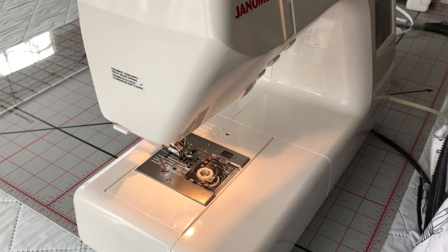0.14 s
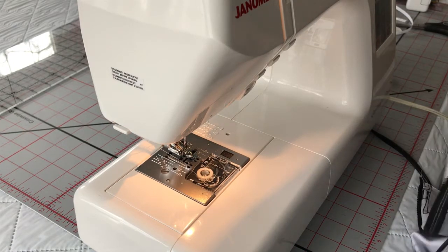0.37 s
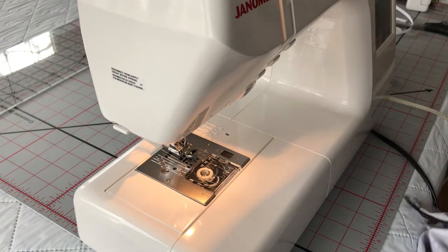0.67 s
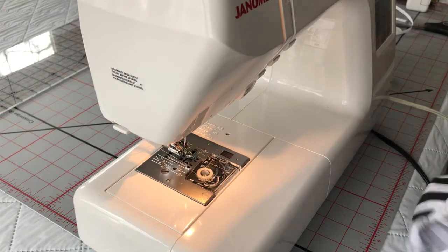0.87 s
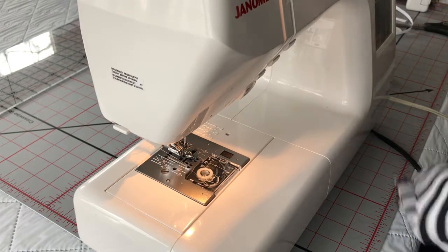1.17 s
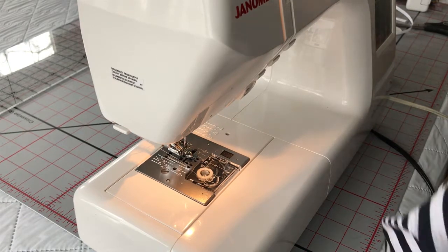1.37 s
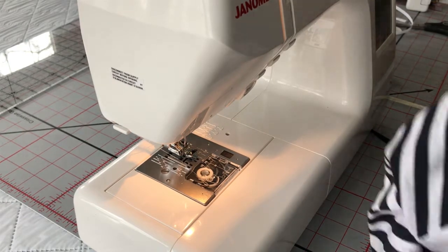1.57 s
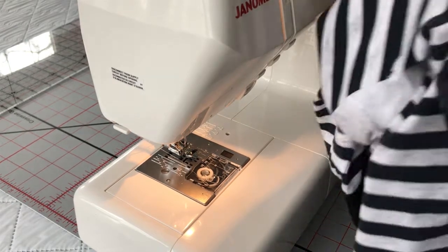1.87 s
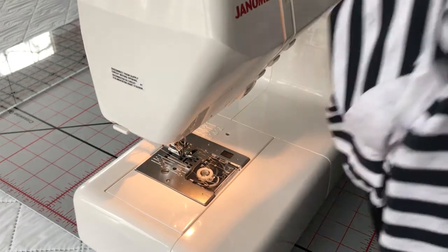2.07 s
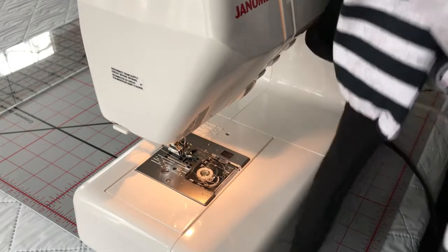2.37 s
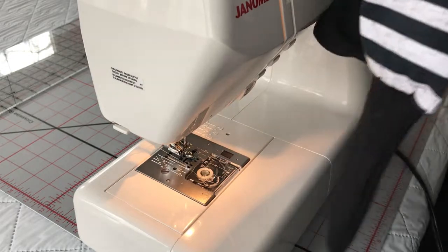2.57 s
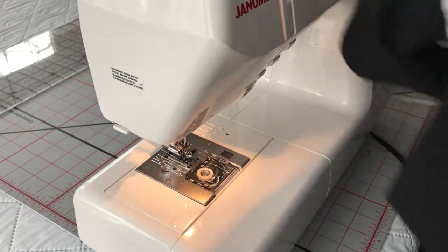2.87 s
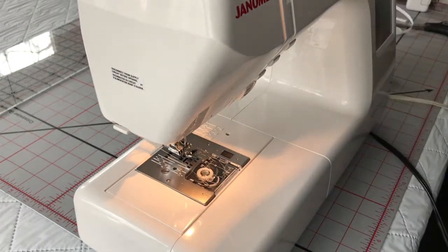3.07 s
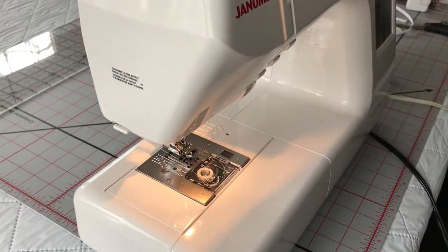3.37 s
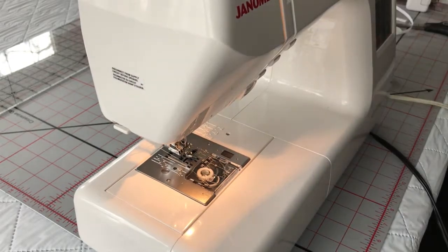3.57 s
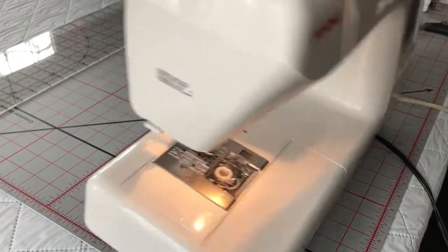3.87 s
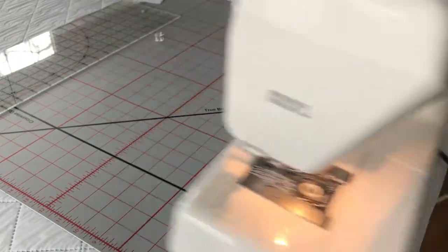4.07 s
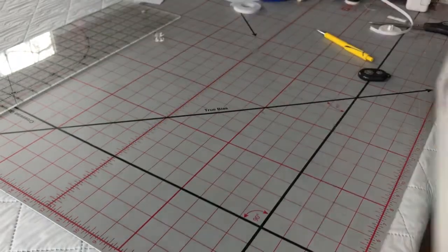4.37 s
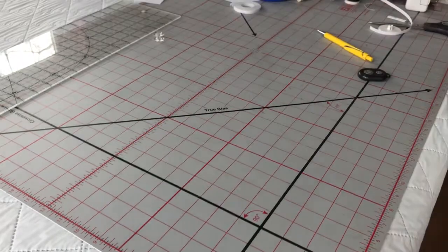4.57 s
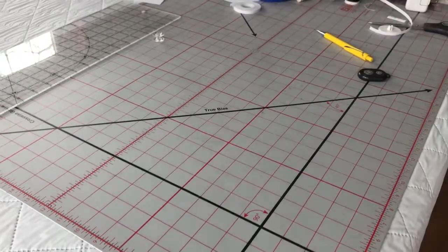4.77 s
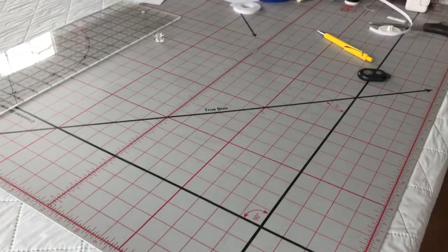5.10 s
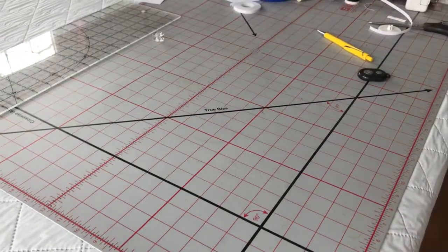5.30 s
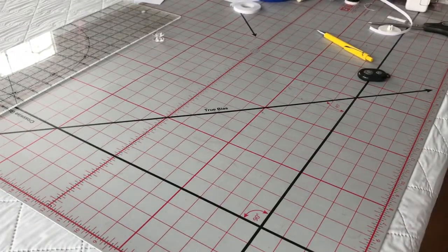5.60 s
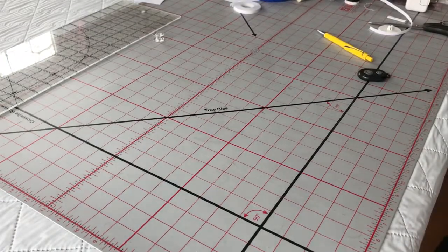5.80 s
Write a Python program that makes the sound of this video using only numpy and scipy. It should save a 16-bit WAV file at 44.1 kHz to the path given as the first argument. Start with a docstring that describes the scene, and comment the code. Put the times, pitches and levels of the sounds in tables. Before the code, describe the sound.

After a few small ticks, a garment zipper is pulled in two strokes from about 0.4 seconds. The first is rough; the second speeds up, rises in pitch and ends with a sharp snap at 1 second. The cloth swishes faintly, then lands with a low thud and a click near 1.9 seconds. Hands rub on a plastic-cased sewing machine, which knocks on the table with a loud, briefly ringing clack at 2.7 seconds and again near 2.9 and 3.5, among lighter clicks and bumps. Around 4 seconds it is pushed across a mat in a short, juddering slide ending with a knock. A small metal thing scrapes briefly at 4.4 seconds. Small hard objects then click, tap and shuffle softly until about 6 seconds, with a very faint thin whine near 5. The sound is close, in a quiet room with a faint hum.

```python
"""A zipper on a garment is pulled in two strokes, its teeth scratching and plucking the taut tape.
The cloth is gathered with a swish and tossed aside with a thud. A plastic-cased sewing machine is
gripped, knocks on the table with a clack and a ring, and is pushed juddering across a cutting mat.
Small hard things click and are shuffled about, and one of metal scrapes. The room is quiet,
with a faint hum and a brief thin whine."""
import sys
import numpy as np
from scipy import signal
from scipy.fft import rfft, irfft, next_fast_len
from scipy.io import wavfile
from scipy.ndimage import uniform_filter1d

SR = 44100
rng = np.random.default_rng(int(sys.argv[2]) if len(sys.argv) > 2 else 0)


def store_pcm(level_fs):
    """Save levels as 16-bit WAV."""
    pcm = np.round(np.clip(level_fs, -1, 1) * 32767).astype(np.int16)
    wavfile.write(sys.argv[1], SR, np.atleast_2d(pcm).T)


N = 262130
TIME = np.arange(N) / SR

# resonances of the zipper's taut tape: (frequency [Hz], width [Hz], level [dB])
TAPE_MODES = [(316, 173, 4), (634, 66, 5), (803, 296, 2), (1140, 147, 1.5), (1700, 250, -8.5)]
# colour of the teeth against the slider: (frequency [Hz], level [dB])
TEETH_COLOUR = [(530, -48), (900, -6), (1000, -4), (1230, -6.5), (1660, -6), (2730, -10), (4980, -10),
                (5410, -9), (8660, -14.5), (12600, -13), (16000, -19)]
# colour of the plastic case, knocked or rubbed: (frequency [Hz], level [dB])
CASE_COLOUR = [(130, -74), (270, 0.5), (420, 0.5), (680, -4), (850, -4.5), (1200, -3), (1550, -3.5),
               (2500, -6), (4500, -9), (16000, -16)]
# the machine hitting the table: (time [s], level [dB], bass gain [dB], hardness as low-pass [Hz])
MACHINE_KNOCKS = [(2.185, -39.5, 5, 3200), (2.564, -44.5, 14, 1780), (2.7044, -17.5, -28, 2410),
                  (2.944, -24.5, -4, 3300), (3.369, -37.5, 5.5, 2500), (3.392, -40.5, 2, 4040),
                  (3.438, -45, 8, 1400), (3.4942, -26, 7, 4020), (3.720, -42, 17, 1500),
                  (3.758, -43, 16.5, 3000), (3.787, -39, -5, 4000), (3.850, -49.5, 16.5, 2200),
                  (3.897, -41, 12, 1380), (4.161, -29.5, -24, 3330), (5.012, -44.5, 9, 5100),
                  (5.194, -35, -23, 5000), (5.274, -42, 17, 744), (5.296, -45, 13, 900),
                  (5.436, -38.5, 4, 695), (5.492, -43.5, 6, 4100), (5.83, -41, 3, 3480),
                  (5.908, -38, -10, 3000)]


def from_db(db):
    """Decibels to gain."""
    return 10 ** (np.asarray(db) / 20)


def rms_one(x):
    """Scale to unit power."""
    return x / np.sqrt(np.mean(x ** 2) + 1e-20)


def even(x):
    """Hold the power steady over about 35 ms."""
    return x / np.sqrt(np.abs(uniform_filter1d(x * x, size=1500)) + 1e-12)


def at_hz(points, hz):
    """Read a table on a log-frequency axis."""
    freqs, values = np.transpose(points)
    return np.interp(np.log(hz + 1), np.log(freqs), values)


def noise(colour, size=N):
    """Noise of a given colour at unit power."""
    n = next_fast_len(size)
    gains = from_db(at_hz(colour, np.fft.rfftfreq(n, 1 / SR)))
    return rms_one(irfft(rfft(rng.standard_normal(n)) * gains, n)[:size])


def drift(rate_hz):
    """A random wander with a spread near 1."""
    return np.interp(TIME * rate_hz, np.arange(8192), rng.standard_normal(8192))


def cut(x, hz, kind, order=2):
    """Butterworth filter."""
    return signal.sosfilt(signal.butter(order, hz, kind, fs=SR, output="sos"), x + 1e-18)


def resonate(x, modes):
    """Parallel resonances (frequency [Hz], width [Hz], level [dB]) with alternating signs."""
    out = 0
    for k, (hz, width, db) in enumerate(modes):
        r = np.exp(-np.pi * width / SR)
        poles = [2, -4 * r * np.cos(2 * np.pi * hz / SR), 2 * r * r]
        out = out + (-1) ** k * from_db(db) * signal.lfilter([1 - r * r, 0, r * r - 1], poles, x + 1e-18)
    return out


def fade(t, t60):
    """Exponential decay, 60 dB down at t60."""
    return np.exp(-np.log(1000) * t / t60)


def smear(impulses, decay_s):
    """Give each impulse an exponential tail."""
    return signal.lfilter([1], [1, -np.exp(-1 / (decay_s * SR))], impulses + 1e-18)


def envelope(start_s, end_s, attack_s, release_t60, db_per_s=0, hold_s=0):
    """Attack, hold, a steady slope and an exponential release."""
    rise = np.clip((TIME - start_s) / attack_s, 0, 1) ** 2
    sloping_s = np.maximum(np.minimum(TIME, end_s) - start_s - attack_s - hold_s, 0)
    return rise * from_db(db_per_s * sloping_s) * fade(np.maximum(TIME - end_s, 0), release_t60)


def gestures(moves, bed_db, rise_share=0.35, depth_db=21):
    """Gain of hand movements that swell quickly and ebb more slowly, over a faint bed of handling."""
    power = (from_db(bed_db) * envelope(0.99, 5.03, attack_s=0.92, release_t60=3.55)) ** 2
    for peak_s, length_s, db in moves:
        away = np.maximum((peak_s - TIME) / rise_share, (TIME - peak_s) / (1 - rise_share)) / length_s
        power = power + from_db(db - depth_db * away) ** 2
    return np.sqrt(power)


def add(track, s, sound):
    """Mix a sound in at a time."""
    i = round(s * SR)
    track[i:i + len(sound)] += sound[:N - i]


def room_tone(air_db=-61.5, waver_db=2.5):
    """Room air and a faint hum that wavers in level and phase."""
    # colour of the air: (frequency [Hz], level [dB])
    air_colour = [(15, -42), (25, -1), (76, 6), (161, -8), (217, 1.5), (277, -7.5), (489, -15.5),
                  (911, -13), (1650, -26), (3250, -25), (7710, -36), (8590, -24), (10400, -35),
                  (14800, -27), (16000, -30)]
    # partials of the hum: (frequency [Hz], level [dB])
    partials = [(86.1, -67), (118.4, -70), (215.3, -63.5)]
    out = from_db(air_db) * cut(noise(air_colour), 42, "high", order=4)
    for hz, db in partials:
        out += from_db(db + waver_db * drift(8)) * np.sin(2 * np.pi * hz * TIME + 0.87 * drift(4.1))
    return out


def slider_snaps(snap_db=-10, snap_t60=0.016):
    """The slider catches single teeth and hits its stop; each snap plucks the tape once."""
    # snaps of the slider: (time [s], level [dB], relative tape level [dB])
    snaps = [(0.019, -28.5, -13.5), (0.3579, -39, 1.5), (0.398, -34, -0.5), (0.418, -29, -4),
             (0.597, -30, -36), (1.0219, -16, -10.5)]
    out, t = np.zeros(N), TIME[:SR // 10]
    pluck = resonate(1.0 * (t == 0), TAPE_MODES)
    pluck /= np.abs(pluck).max()
    for s, db, tape_db in snaps:
        snap = from_db(snap_db) * noise(TEETH_COLOUR, len(t)) * fade(t, snap_t60)
        add(out, s, from_db(db) * (snap + from_db(tape_db) * pluck))
    return out


def cloth_swish(trim_db=0.5, grain_db=1.5):
    """Fibres brush over each other in a fine, grainy swish."""
    # the cloth gathered and moved: (peak time [s], length [s], level [dB])
    swishes = [(.26, 0.62, -63.5), (1.29, 0.88, -60), (1.66, 0.38, -59.5), (1.9, 0.24, -48),
               (2.87, .6, -60), (3.64, .2, -58.5), (5.91, 0.24, -62)]
    # colour of brushing fibres: (frequency [Hz], level [dB])
    cloth_colour = [(710, 0), (1200, -0.5), (2090, -3.5), (4260, -2), (8720, -7.5), (10500, -11.5),
                    (13300, -8), (16000, -33)]
    grain = from_db(trim_db + grain_db * drift(600))
    return grain * gestures(swishes, bed_db=-66.5) * noise(cloth_colour)


def pull_gains(teeth_per_s, reference_per_s=359):
    """Tape and teeth both grow louder with the slider's speed. Returns (tape, teeth)."""
    # the two strokes: (start [s], end [s], tape at reference speed [dB], teeth at reference speed [dB],
    # tape rise [dB per doubling of speed], teeth rise [dB per doubling of speed])
    strokes = [(.428, 0.662, -37.5, -39.5, 10, 8), (0.667, 1.019, -43, -40.5, 3.2, 4.8)]
    tape, teeth = np.zeros(N), np.zeros(N)
    doublings = np.log2(teeth_per_s / reference_per_s)
    for start, end, tape_db, teeth_db, tape_rise, teeth_rise in strokes:
        pulling = (TIME >= start) & (TIME < end)
        tape += pulling * from_db(tape_db + tape_rise * doublings)
        teeth += pulling * from_db(teeth_db + teeth_rise * doublings)
    return tape, teeth


def tooth_impulses(travel, uneven_db=3):
    """One impulse of uneven strength for every whole tooth travelled."""
    return (np.diff(np.floor(travel), prepend=0) > 0) * from_db(uneven_db * rng.standard_normal(N))


def zipper(scratch_s=0.0034, drag=0.058, lock_lag_teeth=0.24, teeth_trim_db=-2):
    """Each tooth scratches into the slider, locks and plucks the tape; fast plucks fuse into a note."""
    # slider speed over both strokes: (time [s], speed [teeth/s])
    speed_curve = [(.428, 170), (.455, 285), (.485, 316), (.535, 220), (.575, 115), (.665, 51.5),
                   (.72, 82.6), (.755, 144), (.80, 145), (.85, 236), (.92, 332), (1.022, 397)]
    # how raggedly the teeth catch, the first stroke being rougher: (time [s], rasp [0-1])
    rasp_curve = [(.43, 0.85), (.58, 0.7), (.68, 0.22), (1.02, 0.07)]
    speed = np.interp(TIME, *np.transpose(speed_curve))
    rasp = np.interp(TIME, *np.transpose(rasp_curve))
    stutter = (0.016 + 0.07 * rasp) * drift(400)
    travel = np.cumsum(speed * (1 + stutter) / SR)
    entries, locks = tooth_impulses(travel), tooth_impulses(travel - lock_lag_teeth)
    tape_gain, teeth_gain = pull_gains(speed)
    contact = drag + smear(entries + locks, scratch_s)
    scratch = cut(contact * noise(TEETH_COLOUR) * from_db(2.3 * drift(1300)), 770, "high")
    # the faster the pull, the more the slider itself sings
    scratch += (speed / speed.max()) ** 4 * resonate(scratch, [(6240, 510, -0.9)])
    # the lowest tape mode follows the plucks; the higher ones also feel the ragged friction
    plucks = even(locks)
    ragged = np.sqrt(1 - rasp) * plucks + np.sqrt(rasp) * even(contact * rng.standard_normal(N))
    tape = resonate(plucks, TAPE_MODES[:1]) - resonate(ragged, TAPE_MODES[1:2])
    # a harder pull tightens the tape and brings out its upper resonances
    tension = tape_gain / tape_gain.max()
    tape += tension * resonate(ragged, TAPE_MODES[2:])
    return tape_gain * even(cut(tape, 82, "high")) + from_db(teeth_trim_db) * teeth_gain * even(scratch)


def table_rumble(trim_db=3.5):
    """The table rumbles as it is leaned on."""
    # weight on the table: (peak time [s], length [s], level [dB])
    leans = [(1.96, 0.64, -53), (3.17, 0.77, -57), (3.5, 0.33, -69), (4.395, 0.15, -49.5),
             (5.14, 0.27, -59)]
    # colour of the rumble: (frequency [Hz], level [dB])
    colour = [(25, -40), (42, 18), (65, 9), (105, 3.5), (170, 3), (300, -1), (900, -69)]
    return from_db(trim_db) * gestures(leans, bed_db=-66.5) * noise(colour)


def clicks(trim_db=-1, t60=0.031, body_hz=2430, top_hz=7900):
    """Small hard things touch; the farther ones send more into the room. Returns (direct, send)."""
    # contacts: (time [s], level [dB], body gain [dB], top gain [dB], room send [dB])
    contacts = [(1.848, -47, 6.5, 5, 6.5), (1.876, -40, -15, 16, -13), (1.881, -28, 2.5, 3.5, -5),
                (2.711, -54, -17, 20.5, 1), (3.054, -33, -25, -18, 0.5), (3.073, -26.5, -6.5, -20, -7.5),
                (3.08, -40, 7, 2, 0.5), (3.664, -47.5, 10, 15.5, -12.5), (3.715, -33, -12, 7, -14.5),
                (4.556, -61, 9, 11, 10.5), (4.565, -45.5, 5, 12.5, 2), (4.745, -42, 3.5, -4, -1.5),
                (4.842, -63.5, -8, 20, -22), (5.125, -45.5, 1.5, -8, -2.5), (5.243, -54, -3, -7, -8),
                (5.256, -41.5, 8.5, -4, -5.5), (5.281, -42.5, 0, -16, -20), (5.49, -45, 6, -26, -10)]
    # colour of a hard contact: (frequency [Hz], level [dB])
    click_colour = [(180, -30), (300, -6), (680, -3), (1400, -1), (2500, -5), (4200, -4), (6700, -11.5),
                    (10600, -13), (16000, -16.5)]
    direct, send, t = np.zeros(N), np.zeros(N), TIME[:SR // 6]
    for s, db, body_db, top_db, send_db in contacts:
        burst = noise(click_colour, len(t))
        upper = cut(burst, body_hz, "high")
        body = from_db(body_db) * cut(burst, body_hz, "low")
        middle = cut(upper, top_hz, "low")
        top = from_db(top_db) * cut(upper, top_hz, "high")
        # the middle band is inverted so that the crossovers leave no notch
        click = from_db(db + trim_db) * (body - middle + top) * fade(t, t60)
        add(direct, s, click)
        add(send, s, from_db(send_db) * click)
    return direct, send


def bundle_thud(softness_hz=260):
    """The soft bundle lands in a few bumps that set low modes booming."""
    # bumps of the landing: (time [s], level [dB])
    bumps = [(1.855, -27.5), (1.874, -27), (1.905, -27.5), (1.93, -39)]
    # modes of the boom: (frequency [Hz], level [dB], t60 [s])
    boom_modes = [(101, -14, 0.32), (120, -17, 0.14), (149, -1, 0.21), (167, -4.5, 0.096)]
    out, t = np.zeros(N), TIME[:SR // 2]
    boom = sum(from_db(db) * np.sin(2 * np.pi * hz * t) * fade(t, t60) for hz, db, t60 in boom_modes)
    for s, db in bumps:
        add(out, s, from_db(db) * boom)
    return cut(cut(out, softness_hz, "low", order=4), 70, "high")


def hand_rub(trim_db=2, catches_per_s=45, catch_db=5.5):
    """Hands and things rub with a dull friction noise, dotted with little catches."""
    # rubbing movements: (peak time [s], length [s], level [dB])
    rubs = [(2.2, 0.46, -63), (2.72, 0.12, -39.5), (2.91, 0.11, -50), (3.82, 0.49, -66),
            (4.186, 0.061, -44.5), (5.05, 0.31, -58), (5.3, 0.33, -57.5), (5.57, 0.08, -58),
            (5.74, 0.14, -57), (5.87, 0.6, -56)]
    catches = smear(rng.random(N) < catches_per_s / SR, decay_s=0.001)
    texture = np.hypot(1, from_db(catch_db) * catches)
    friction = rms_one(cut(noise(CASE_COLOUR), 2270, "low"))
    return from_db(trim_db) * texture * gestures(rubs, bed_db=-73) * friction


def case_ring(t, detune=0.0047):
    """The plastic case rings, each mode with a random sign and slight detuning at every blow."""
    # modes of the case: (frequency [Hz], level [dB], t60 [s])
    case_modes = [(271, -11.5, 0.32), (302, -8, 0.27), (394, -21.5, 0.39), (573, -6.5, 0.19),
                  (828, -1, 0.042), (900, -3, 0.14), (1065, 5, 0.025), (1064, -11, 0.083), (1456, 1, 0.046),
                  (1545, -13, 0.1), (1726, -20, 0.17), (2200, -1.5, 0.049), (2620, -51, 0.14),
                  (3000, -14, 0.06), (3740, -62, .07)]
    ring = np.zeros(len(t))
    for hz, db, t60 in case_modes:
        gain = from_db(db) * rng.choice([-1, 1])
        pitch_hz = hz * (1 + detune * rng.standard_normal())
        ring += gain * np.sin(2 * np.pi * pitch_hz * t) * fade(t, t60)
    return ring


def machine_knocks(ring_db=-12.5, attack_s=0.00099, bass_hz=380):
    """The machine hits the table and bounces back down a moment later; each contact gives a short clack and
    rings the case."""
    # the blow and its rebound: (delay [s], level [dB], share of the hardness [0-1])
    bounces = [(0, -1, 1), (0.0045, -2, 0.99)]
    out, t = np.zeros(N), TIME[:SR // 3]
    for s, db, bass_db, hardness_hz in MACHINE_KNOCKS:
        for delay_s, bounce_db, share in bounces:
            cutoff_hz = share * hardness_hz
            clack_t60 = 0.022 * (3000 / cutoff_hz) ** 0.42   # softer blows are duller and last longer
            ring = from_db(ring_db) * case_ring(t)
            clack = noise(CASE_COLOUR, len(t)) * fade(t, clack_t60)
            blow = (clack + ring) * (1 - np.exp(-t / attack_s))
            blow += (from_db(bass_db) - 1) * cut(blow, bass_hz, "low", order=1)
            add(out, s + delay_s, from_db(db + bounce_db) * cut(blow, cutoff_hz, "low"))
    return out


def machine_rattle(heavy_db=-12.5, growth=1.5, t60=0.19):
    """Loose parts rattle on after a heavy blow and barely stir after a light one."""
    out, t = np.zeros(N), TIME[:SR // 3]
    for s, db, _, _ in MACHINE_KNOCKS:
        shake = cut(noise(CASE_COLOUR, len(t)), [740, 1450], "band") * fade(t, t60)
        add(out, s, from_db(db + growth * (db - heavy_db)) * shake)
    return out


def machine_slide(level_db=-30.5, grit_db=-16.5, bite_db=-11):
    """The feet judder over the mat and shake the case; the hardest part of the push is the brightest."""
    # resonances of the sliding case: (frequency [Hz], width [Hz], level [dB])
    modes = [(519, 76, -7.5), (1024, 51, 2), (1140, 40, -2), (1264, 83, -2.5), (1805, 120, -7.5),
             (2080, 150, -9.5), (3000, 760, -18.5), (4300, 280, -18), (5470, 240, -23.5),
             (7100, 200, -27.5)]
    # the machine breaks loose, runs on, slows steadily and stops
    push = envelope(3.953, 4.12, attack_s=0.055, release_t60=0.24, db_per_s=-103, hold_s=0.044)
    judder = from_db(drift(160))
    ring = even(cut(resonate(rng.standard_normal(N), modes), 450, "high"))
    grit = from_db(grit_db) * cut(noise(CASE_COLOUR), 320, "high")
    bite = from_db(bite_db) * rms_one(cut(resonate(rng.standard_normal(N), modes), 1400, "high", order=4))
    return from_db(level_db) * push * judder * (ring + grit + push * bite)


def metal_scrape(start_s=4.373, end_s=4.396, level_db=-41.5, ring_db=-7.5):
    """A small metal thing scrapes, pressing harder as it goes, and rings on briefly."""
    # resonances of the metal: (frequency [Hz], width [Hz], level [dB])
    modes = [(1160, 780, -5.5), (2283, 30, 7), (3940, 490, 4), (5800, 440, -1.5), (6586, 960, -1),
             (9500, 620, -4.5), (11900, 2300, -10)]
    contact = envelope(start_s, end_s, attack_s=0.002, release_t60=0.029, db_per_s=247)
    ringing = from_db(ring_db) * envelope(start_s, end_s, attack_s=0.002, release_t60=0.27)
    metal = rms_one(resonate(rng.standard_normal(N), modes))
    return from_db(level_db) * np.hypot(contact, ringing) * metal


def whine(level_db=-76.5):
    """A thin, high band of noise comes and goes."""
    band = resonate(rng.standard_normal(N), [(9730, 220, 0)])
    band = rms_one(resonate(band, [(9600, 290, 0)]))
    return from_db(level_db) * envelope(4.56, 5.12, attack_s=0.1, release_t60=0.25) * band


def room_reverb(send, build_s=0.0043):
    """Diffuse reflections build up over a few milliseconds and die band by band."""
    # decay of the room: (frequency [Hz], t60 [s])
    decay = [(100, 0.87), (500, 0.54), (3000, 0.43), (8000, 0.27), (16000, 0.23)]
    t, edges = TIME[:SR], np.geomspace(50, 18000, 9)
    tail = np.zeros(SR)
    for low, high in zip(edges, edges[1:]):
        band = cut(rng.standard_normal(SR), [low, high], "band")
        tail += band * fade(t, at_hz(decay, np.sqrt(low * high)))
    tail *= 1 - np.exp(-(t / build_s) ** 2)
    return signal.fftconvolve(send, tail / np.sqrt(np.sum(tail ** 2)))[:N]


def scene():
    """A close mono mix; zipper, clicks, thud and machine also feed the room's reverb."""
    zipping = zipper() + slider_snaps()
    clicking, send = clicks()
    thud = bundle_thud()
    knocking = machine_knocks() + machine_rattle()
    sliding = machine_slide()
    for layer, send_db in ((zipping, -15), (thud, -14.5), (knocking, -13), (sliding, -15.5)):
        send += from_db(send_db) * layer
    handling = cloth_swish() + table_rumble() + hand_rub()
    direct = zipping + clicking + thud + knocking + sliding + handling + metal_scrape()
    return (direct + room_reverb(send) + room_tone() + whine())[None]


def record(dry):
    """A steep low-pass takes off the top above 16.3 kHz."""
    return signal.sosfilt(signal.ellip(10, 0.2, 75, 16300, fs=SR, output="sos"), dry)


dry = scene()
out = record(dry)
store_pcm(out)
```